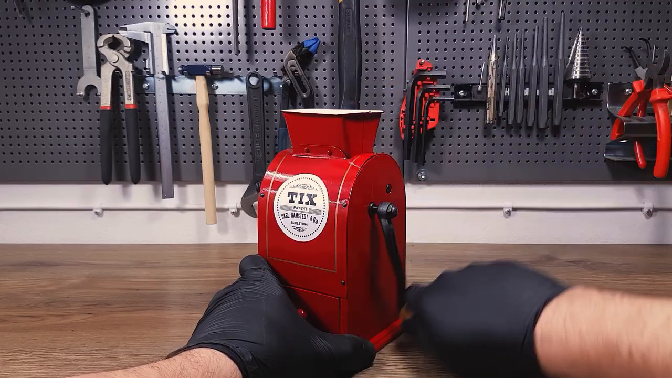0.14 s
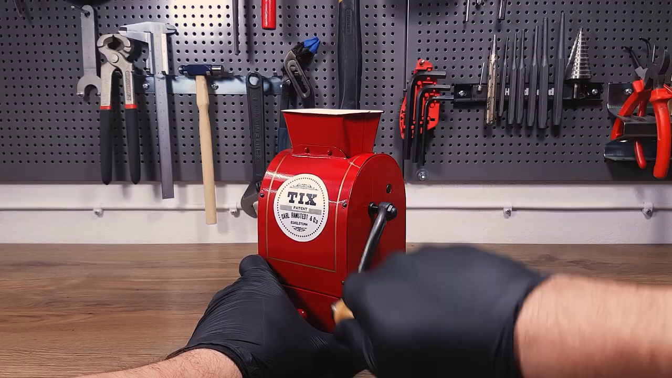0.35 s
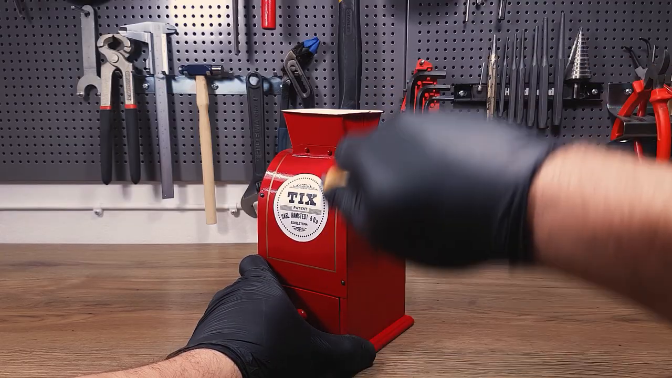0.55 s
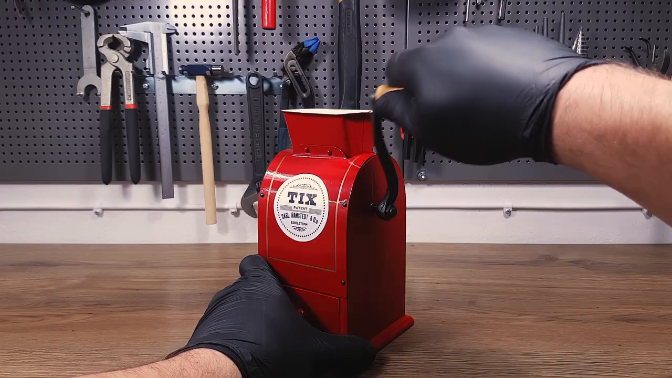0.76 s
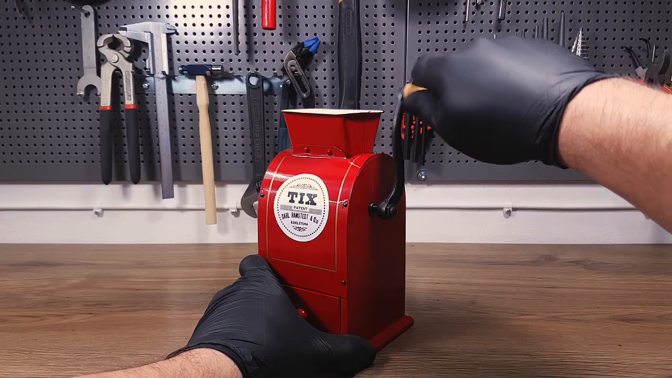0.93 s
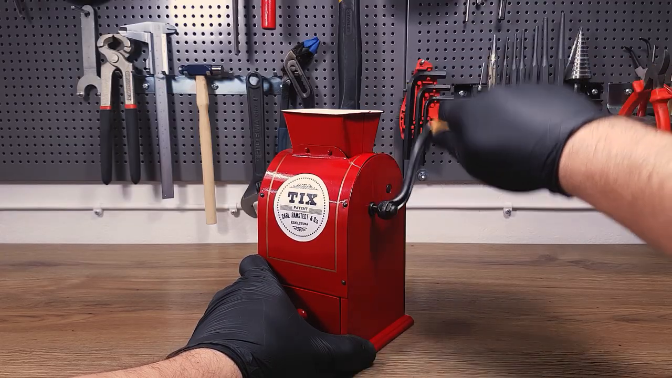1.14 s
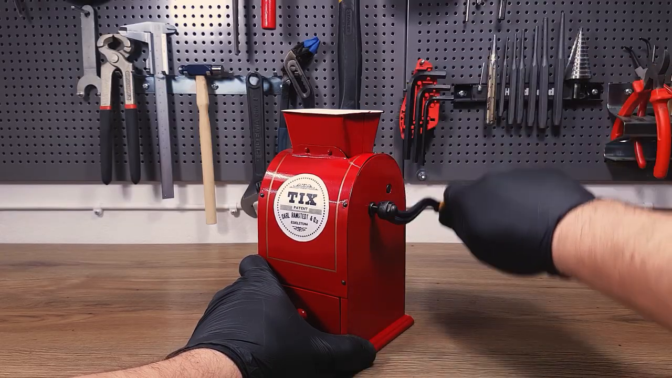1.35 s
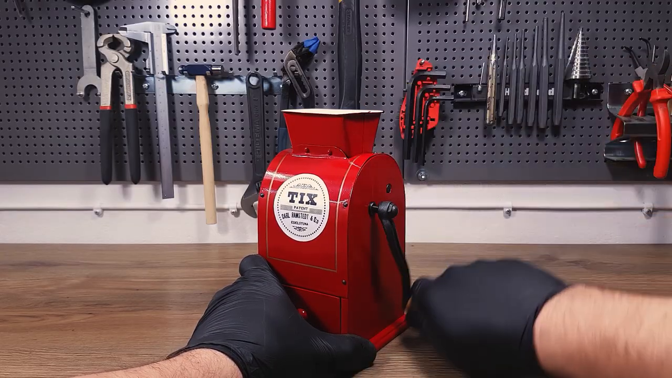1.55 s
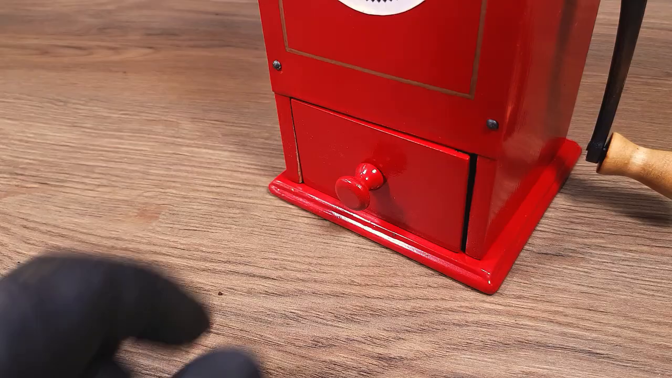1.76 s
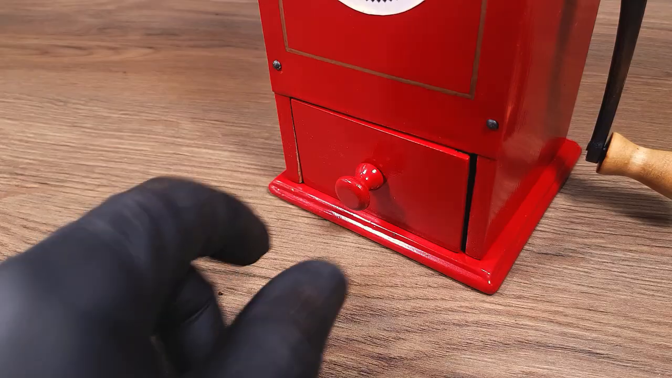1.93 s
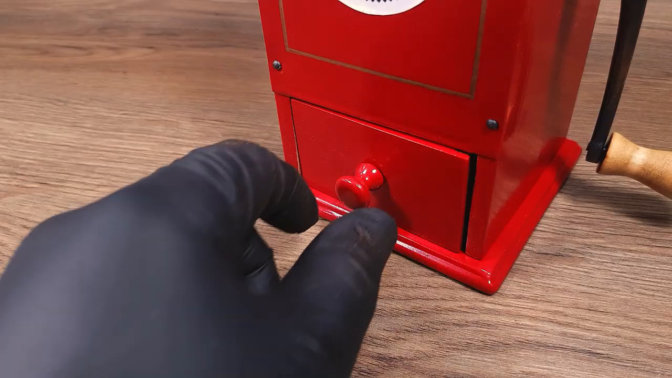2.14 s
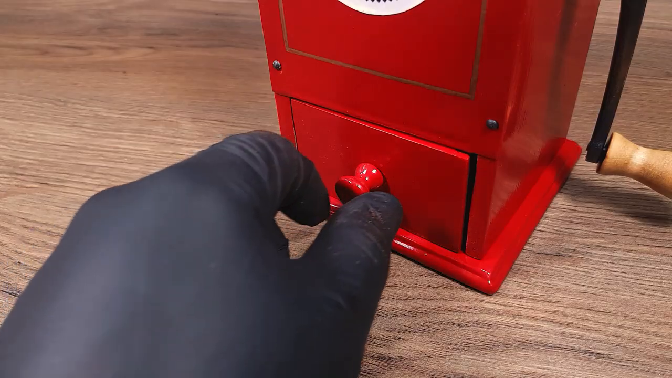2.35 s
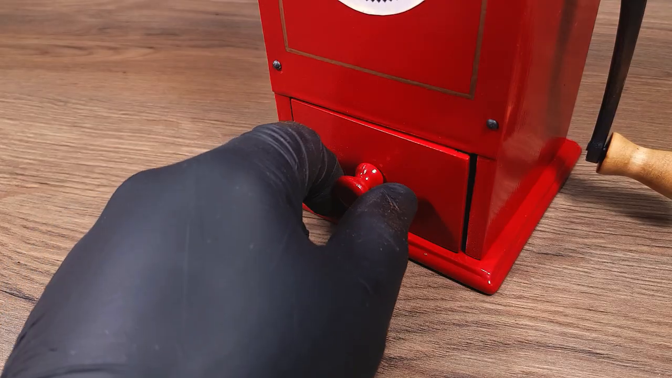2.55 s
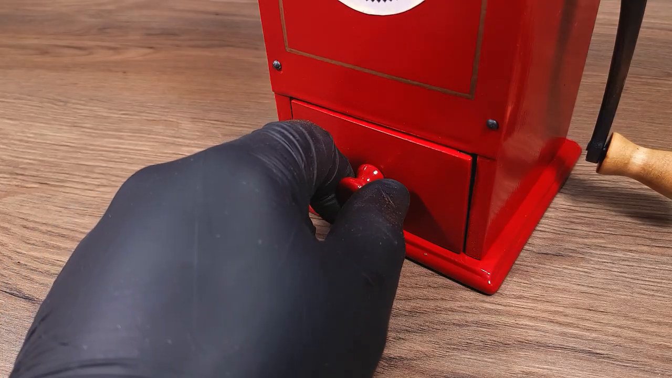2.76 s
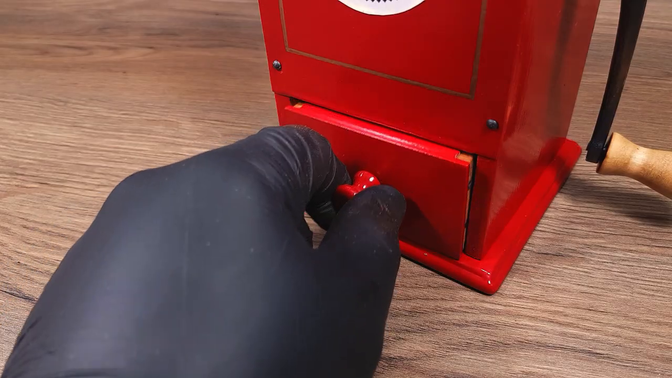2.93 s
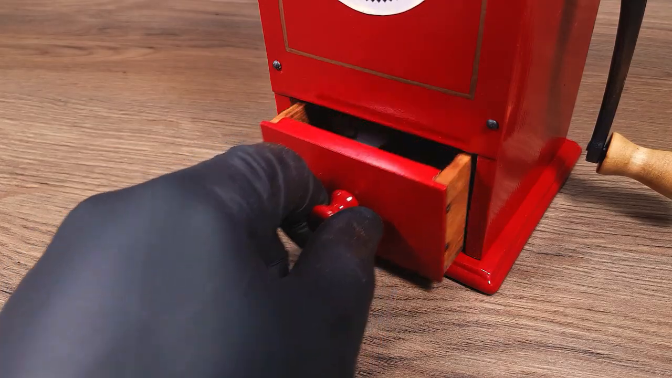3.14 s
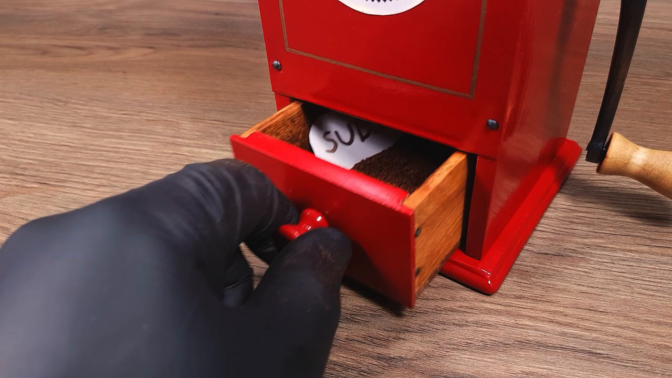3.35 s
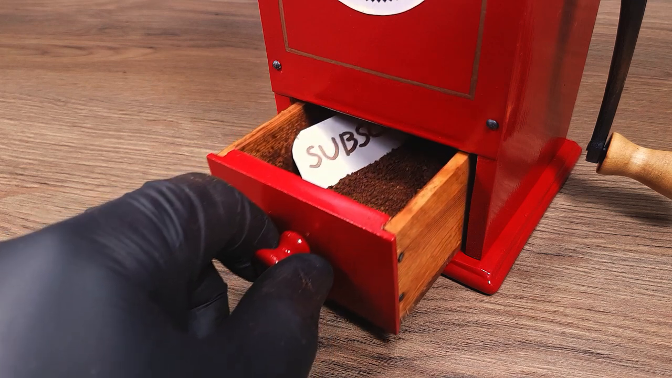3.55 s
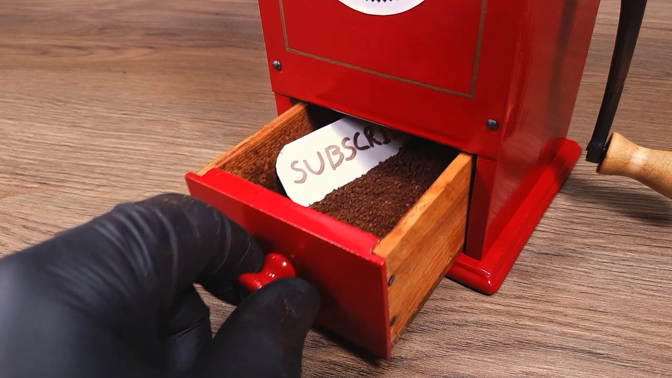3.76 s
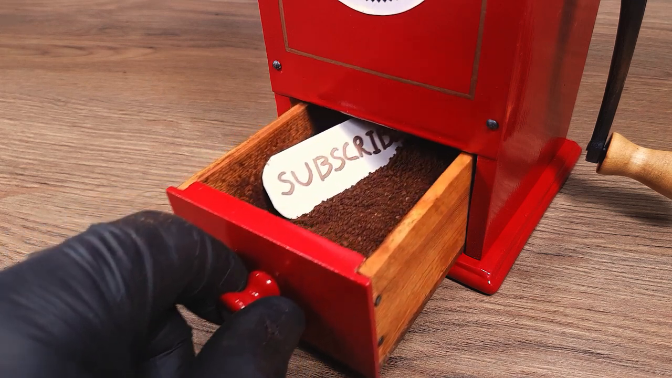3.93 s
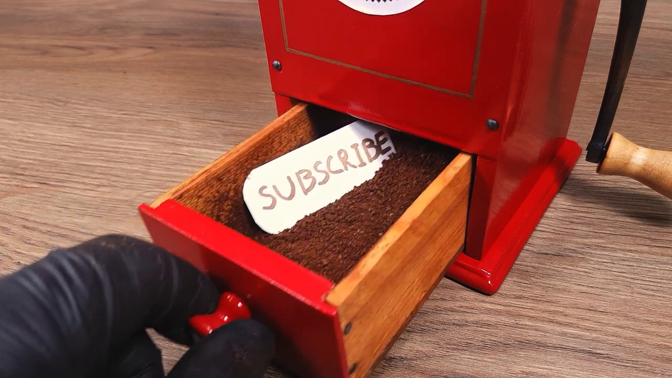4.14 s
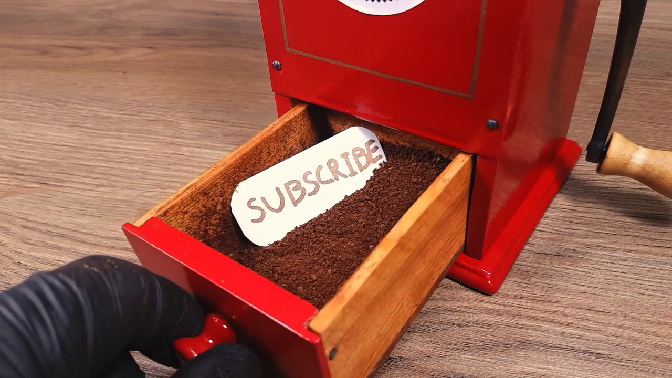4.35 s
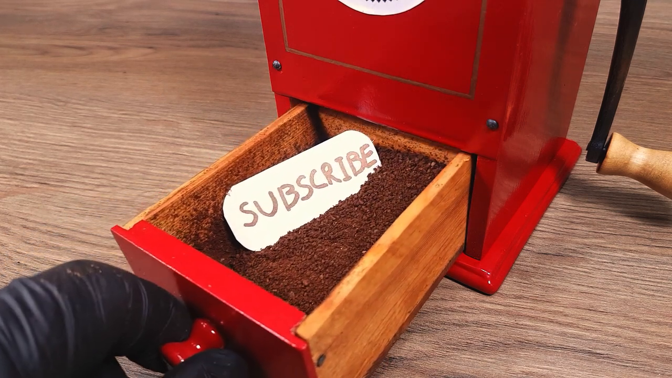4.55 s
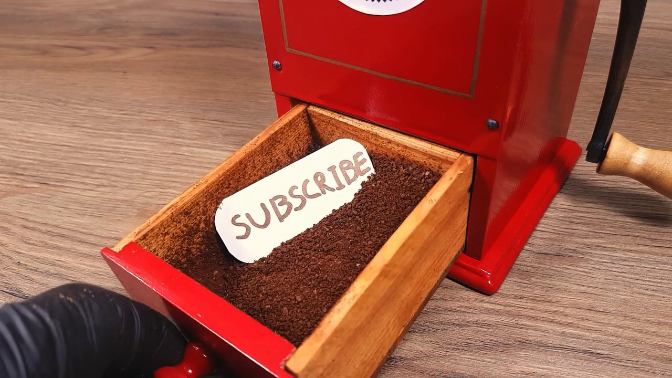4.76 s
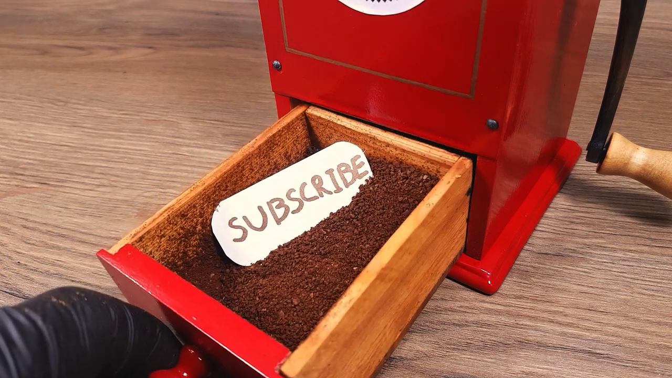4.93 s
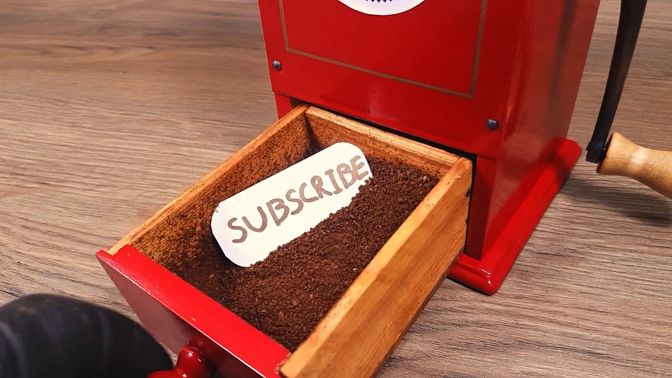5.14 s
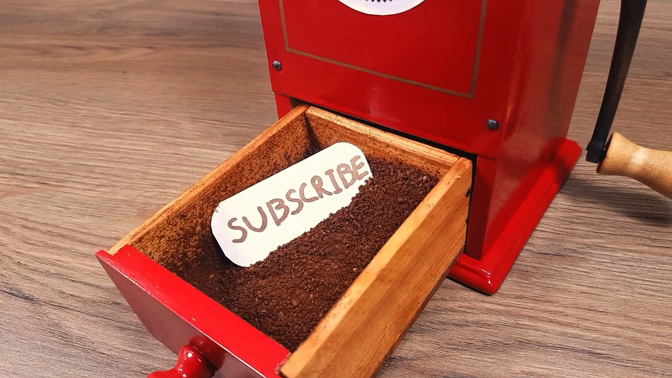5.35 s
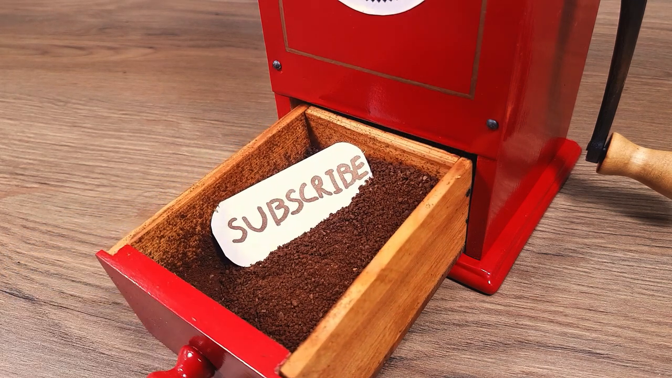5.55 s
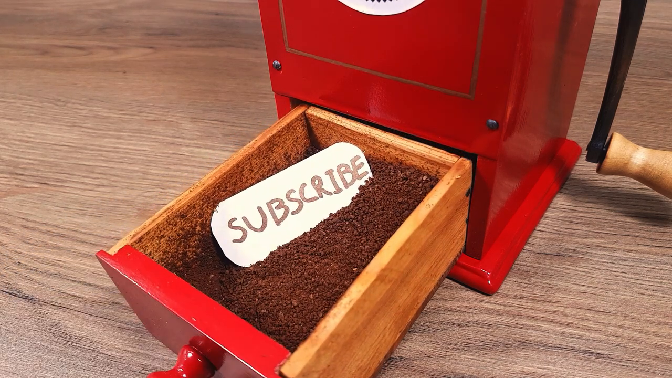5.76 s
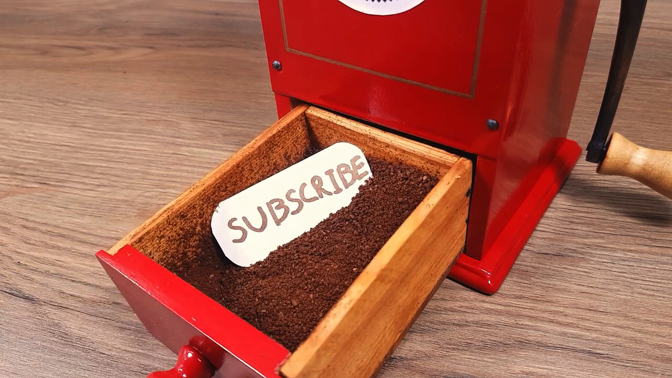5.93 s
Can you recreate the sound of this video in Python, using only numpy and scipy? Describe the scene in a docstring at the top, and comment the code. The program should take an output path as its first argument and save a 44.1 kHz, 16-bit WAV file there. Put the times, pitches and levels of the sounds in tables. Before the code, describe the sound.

Beans snap and crumble between burrs for under two seconds, ringing a thin tin shell and wooden base on a bench. The grinding and its echo are cut short. After a near-silent pause, a drawer is pulled out softly at close range: gritty wood friction, low short creaks, light taps, then two firmer knocks and faint handling. Small dry room, stereo, low rumble and hiss.

```python
"""At a workbench in a small workshop, a hand-cranked coffee mill opens the scene on a stereo microphone.
Beans crack between the burrs: bursts of force ring modes of bench, wooden base and tin shell, over a rasp.
A splice cuts the grinding and its echo short. Nearer and quieter, a gloved hand then slides out the wooden
drawer: grains of friction, short stick-slip tones, and two knocks at its end.
Shaped noise gives the room rumble and microphone hiss under it all."""
import sys
import numpy as np
from scipy import signal
from scipy.io import wavfile
from scipy.ndimage import uniform_filter1d

SR = 44100
rng = np.random.default_rng(int(sys.argv[2]) if len(sys.argv) > 2 else 0)


def dump_mix(stems):
    """Bounce the given channels to the path in sys.argv[1] as a 16-bit WAV at rate SR."""
    frames = np.atleast_2d(stems).T  # one column per channel
    limited = np.clip(frames, -1, 1)  # hard clip at full scale
    pcm = np.round(limited * 32767).astype(np.int16)
    wavfile.write(sys.argv[1], SR, pcm)


N = 264600  # 6 s


def amp(db):
    """Decibels to an amplitude factor."""
    return 10 ** (np.asarray(db) / 20)


def evened(x):
    """Scale to an rms of one."""
    return x / np.sqrt(np.mean(x ** 2) + 1e-20)


def read(points, hz):
    """Read a curve of (frequency, value) between its points, along log frequency."""
    f, value = np.transpose(points)
    return np.interp(np.log(hz + 1), np.log(f + 1), value)


# background spectrum, relative: pitch_hz, level_db (per Hz)
AIR_SPECTRUM = [(15, 13), (40, -3), (100, -0.5), (200, -7), (380, -5), (450, -12.5), (900, -12.5),
                (1800, -13), (3000, -20.5), (4800, -23.5), (8000, -29), (10000, -29), (12000, -26.5),
                (16000, -23)]
# likeness of the background at the two ports: pitch_hz, likeness (-1 to 1)
AIR_LIKENESS = [(60, 0.84), (180, 0.075), (550, -0.096), (1650, 0.15), (4970, -0.054), (15000, 0.027)]


def air():
    """Low room rumble and microphone hiss, as random short-time spectra partly shared by the two ports."""
    level_db = -67.5  # rms, before the gain of each shot
    frames, hz = N // 256 + 5, np.fft.rfftfreq(1024, 1 / SR)
    a, b, c, d = rng.standard_normal((frames, 513, 4)).T
    left, other = a + 1j * b, c + 1j * d
    same = np.clip(read(AIR_LIKENESS, hz), -1, 1)[:, None]
    right = same * left + np.sqrt(1 - same ** 2) * other
    spectra = np.array([left, right]) * amp(read(AIR_SPECTRUM, hz))[:, None]
    noise = signal.istft(spectra, nperseg=1024, noverlap=768)[1][:, :N]
    return amp(level_db) * evened(noise)


# echo of the workshop: pitch_hz, t60_s
ROOM_DECAY = [(100, 0.23), (500, 0.25), (2000, 0.23), (8000, 0.14)]


def room(x, wet_db):
    """Sparse taps of random sign, each band dying at its own speed; long waves reach both ports alike."""
    taps = np.zeros((2, SR // 2))
    grid = np.arange(120, SR // 2 - 20, 20)
    at = grid + rng.integers(0, 20, (2, len(grid)))
    np.put_along_axis(taps, at, rng.choice([-1., 1.], at.shape), 1)
    hz, t, (left, other) = signal.stft(taps, SR, nperseg=512)
    same = np.sinc(hz / 900)[:, None]
    right = same * left + np.sqrt(1 - same ** 2) * other
    decay = amp(-60 * t / read(ROOM_DECAY, hz)[:, None])
    tail = signal.istft(np.array([left, right]) * decay, SR, nperseg=512)[1]
    echo = signal.fftconvolve(x, tail / np.linalg.norm(tail[0]), axes=1)[:, :N]
    return x + amp(wet_db) * echo


def placed(x, lag_samples, pan_db):
    """The source is to the right: the left port hears it later and, with a negative pan, softer."""
    return np.array([np.roll(x[0], lag_samples), x[1]]) * amp([[pan_db / 2], [-pan_db / 2]])


def ring(modes, count=1):
    """Impulse response of each mode at each port, higher modes differing more in phase; thin walls split modes."""
    hz, db, t60 = np.repeat(modes, count, axis=0).T[:, :, None]
    hz = hz * (1 + 0.0115 * (count - 1) * rng.standard_normal(hz.shape))
    t = np.arange(SR // 4) / SR
    turn = rng.standard_normal(hz.shape) * np.minimum(0.39 + hz / 2200, 1.2)  # radians between ports
    decay = amp(db - 60 * t / t60) / np.sqrt(t60)
    onset = np.minimum(hz * t / 0.39, 1) ** 2
    shapes = [decay * onset * np.sin(2 * np.pi * hz * t + side * turn) for side in (0, 1)]
    return hz[:, 0], np.array(shapes)


def colour(points):
    """A causal click with the given spectrum, scattered for a moment in another way for each port."""
    hz = abs(np.fft.fftfreq(4096, 1 / SR))
    gain = np.log(amp(np.maximum(read(points, hz), -100)))
    click = np.fft.ifft(np.exp(np.conj(signal.hilbert(gain)))).real[:1024]  # minimum phase
    scatter = rng.standard_normal((2, 6, 200)) * np.exp(-np.arange(200) / SR / 0.00055)
    shapes = signal.fftconvolve(scatter, click[None, None], axes=2)
    return np.ones(6), shapes / np.linalg.norm(shapes, axis=2, keepdims=True)


def struck(part, spot_db, favoured_hz=1, fall_db=0):
    """One spot of the object: it wakes each mode more or less, in either sense, less those far from one pitch."""
    hz, shapes = part
    octaves_away = abs(np.log2(hz / favoured_hz))
    db = spot_db * rng.standard_normal(len(hz)) - fall_db * octaves_away
    return np.einsum("cmt,m->ct", shapes, amp(db) * rng.choice([-1, 1], len(hz)))


def grains(per_s, spread_db, ms):
    """Random small breaks, a few of them large, each a short dying burst of noise."""
    size = amp(spread_db * np.minimum(rng.exponential(1, N), 4)) * (rng.random(N) < per_s / SR)
    power = signal.lfilter([1], [1, -np.exp(-2000 / (ms * SR))], size ** 2)
    return np.sqrt(power) * rng.standard_normal(N)


def shares(curve, parts_db, follow):
    """One control shakes three parts of an object, each by its own amount; the treble has its own level."""
    s, push, treble = np.transpose(curve)
    mid = push.mean()
    levels = [mid + db + k * (push - mid) for db, k in zip(parts_db, follow)]
    return np.transpose([s, *levels, treble])


def rubbed(parts, curve, breaks, smooth, spot_db):
    """Small breaks at several spots, over a smooth scrape, drive all parts of one object."""
    s, *levels = np.transpose(curve)
    a, b = round(s[0] * SR), round(s[-1] * SR)
    out = np.zeros((2, N))
    spots = [grains(**breaks)[a:b] for _ in range(3)]
    for part, db, even in zip(parts, levels, smooth):
        level = amp(np.interp(np.arange(a, b) / SR, s, db)) / np.sqrt(len(spots) * (1 + even ** 2))
        for spot in spots:
            force = level * (evened(spot) + even * rng.standard_normal(b - a))
            body = struck(part, spot_db)
            body = body / np.linalg.norm(body[1])
            sound = signal.oaconvolve(force[None], body, axes=1)[:, :N - a]
            out[:, a:a + sound.shape[1]] += sound
    return out


def hit(parts, events, bench_db, spot_db, fall_db):
    """Each blow is a sharp break and a dying, grainy burst of force on a new spot; the bench follows the thud."""
    bench_hz, bench_fall_db = 192, 3  # pitch most woken in the bench, loss per octave away
    dry_db, dry_s = 2, 0.0018  # the pressing contact damps the first moments: a dry crack over the ring
    out, t = np.zeros((2, N + SR)), np.arange(SR // 10) / SR
    for at, db, hz, thud_db, high_db, length in events:
        first_break = 1.06 * np.exp(-t / 0.00042)
        crumbling_tail = 0.2 * np.exp(-t / (5.7 * length))
        force = np.exp(-t / length) + first_break + crumbling_tail
        blow = rng.standard_normal(len(t)) * np.minimum(t / 0.00021, 1) * force
        # in order: bench, thudding wood, main walls, treble
        rel_dbs = (thud_db + bench_db, thud_db, 0, high_db)
        pitches, falls = (bench_hz, 1, hz, 1), (bench_fall_db, 0, fall_db, 0)
        for part, rel_db, pitch, fall in zip(parts, rel_dbs, pitches, falls):
            body = struck(part, spot_db, pitch, fall)
            body = body * (1 + amp(dry_db) * np.exp(-np.arange(body.shape[1]) / SR / dry_s))
            sound = signal.fftconvolve(blow[None], body, axes=1)
            start = round(at * SR)
            out[:, start:start + sound.shape[1]] += amp(db + rel_db) * sound / abs(sound).max()
    return out[:, :N]


def stick_slip(rows):
    """Short swells of regular stick and slip: a wavering tone with a faint octave, alike at both ports."""
    at, db, hz, half = np.transpose(rows)[:, :, None]
    t = np.arange(N) / SR - at
    waver = 0.42 * evened(uniform_filter1d(rng.standard_normal(N), 900)) / np.pi
    turns = hz * t + rng.random((len(at), 1)) + waver
    swell = amp(db) * np.exp(-(t / half) ** 2)
    tone = np.sin(2 * np.pi * turns) + 0.1 * np.sin(4 * np.pi * turns)
    return (swell * tone).sum(0)


# modes of the bench under mill and drawer, of the wooden box and of its panels, nominal and relative:
# pitch_hz, level_db, t60_s
BENCH_MODES = [(59.7, -1.5, 0.086), (85, -18, 0.13), (100.4, -2.5, 0.13), (160.4, -4, 0.34),
               (190.8, 1, 0.1), (247.5, -4.5, 0.092)]
BOX_MODES = [(325.6, -2, 0.12), (440.3, -6.5, 0.12), (522, -2.5, 0.037), (595.6, 0, 0.065),
             (666, -7.5, 0.058)]
PANEL_MODES = [(824, -3, 0.046), (1080, -7.5, 0.0063), (1206, -12, 0.055), (1413, -1, 0.026),
               (1587, -3, 0.068), (1905, -0.5, 0.024), (2193, -1.5, 0.022), (2390, 0, 0.0055),
               (2810, -1.5, 0.011), (3314, -7, 0.032)]
# spectrum of coffee grit under the wood, relative: pitch_hz, level_db (per Hz)
GRIT_SPECTRUM = [(1800, -21), (2800, 3), (3900, -1), (4700, -1), (5900, -3), (6800, -0.5), (8500, -10),
                 (10500, -9.5), (13000, -10), (16000, -23)]
# drawer and hand rubbing, between points: time_s, pressure_db, grit_db
SLIDE_CURVE = [(1.69, -78, -90), (2.47, -77.5, -88), (2.96, -69, -84), (3.09, -62, -77), (3.24, -63.5, -83),
               (3.37, -60, -68.5), (3.51, -63, -78), (3.72, -64, -74.5), (3.86, -65, -72.5),
               (4.01, -63, -68.5), (4.2, -66.5, -77), (4.34, -71, -86), (4.51, -74.5, -101),
               (4.73, -74, -87), (4.89, -66.5, -88), (5.4, -73.5, -88), (5.64, -75, -86), (6.0, -70.5, -94)]
# share of the rubbing: bench_db, box_db, panels_db at middling pressure
DRAWER_SHARE_DB = (0.5, -6, -8.5)
# how each follows the pressure: bench, box, panels (dB per dB)
DRAWER_SHARE_FOLLOW = (0.84, 1.11, .6)
# taps, slips and knocks of the drawer, before pan and room:
# start_s, panel_peak_db, panel_pitch_hz (most woken), box_thud_db, grit_db (both re panel), contact_s
DRAWER_KNOCKS = [(2.695, -58, 786, 4.5, 4.5, 0.0019), (2.903, -57.5, 1840, -4, -17, .0049),
                 (2.942, -59, 1340, 3, -0.5, 0.0042), (3.029, -60, 791, 8, 5.5, 0.005),
                 (3.067, -58.5, 845, 4.5, 2.5, 0.0041), (3.234, -43, 2940, -3, 4.5, 0.0023),
                 (3.328, -60, 1900, -9, 6.5, .0046), (3.341, -60, 1590, -2, 7, .0039),
                 (3.384, -56, 1600, -2, 3, .0035), (3.489, -47.5, 2500, -12, -3, 0.0026),
                 (3.678, -52.5, 1800, -1, -2.5, 0.0033), (3.768, -53, 1330, -7, -5, 0.0031),
                 (3.806, -61, 2290, -18, 7, .0035), (3.862, -53.5, 1520, 1.5, -8, .0035),
                 (3.9, -55, 2160, -5, -14, .0035), (3.931, -53.5, 1500, 1, -14, 0.0058),
                 (3.963, -51.5, 791, -1, -20, 0.0042), (4.007, -51.5, 2190, -4, -8, 0.0051),
                 (4.031, -55.5, 1390, -9, 2, .0041), (4.068, -57, 2220, -5, 2, .0028),
                 (4.774, -38.5, 970, 0, -21, 0.0068), (4.814, -48, 1200, 8, -12, 0.0067),
                 (4.842, -56, 1200, 7, -25, .006), (4.984, -55.5, 2070, -6, -16, 0.0098),
                 (5.012, -43.5, 1310, 5.5, -18, 0.0025), (5.018, -50, 2310, 5, -30, 0.0075)]
# the drawer sticks and shudders: middle_s, level_db (main tone, before pan and room), pitch_hz,
# half_length_s (to 1/e)
DRAWER_SHUDDERS = [(2.22, -60, 170, 0.0078), (2.94, -56, 193.5, 0.032), (3.07, -54.5, 203, 0.024),
                   (3.17, -52, 193, 0.045), (3.39, -55, 209, 0.042), (3.43, -61, 254, 0.014),
                   (3.51, -51.5, 191.5, 0.024), (3.71, -58, 252, 0.024), (3.825, -55, 190, 0.025),
                   (3.94, -57, 178, 0.029), (4.29, -54, 198.6, 0.027), (4.7, -52, 213, 0.016),
                   (4.8, -40.5, 181, 0.018), (4.85, -46.5, 184.4, 0.019), (5.03, -48.5, 188, 0.015),
                   (5.26, -54, 166.4, 0.02), (5.85, -59.5, 173, 0.02)]


def drawer():
    """Wood slipping over wood and coffee grit: rubbing grains, blows and shudders ring bench, box and panels."""
    parts = [ring(BENCH_MODES), ring(BOX_MODES, count=3), ring(PANEL_MODES, count=4), colour(GRIT_SPECTRUM)]
    curve = shares(SLIDE_CURVE, DRAWER_SHARE_DB, DRAWER_SHARE_FOLLOW)
    breaks = dict(per_s=120, spread_db=3.5, ms=2.)
    scrape = rubbed(parts, curve, breaks, smooth=(1.7, 1.2, 0.7, 0.36), spot_db=0.0)
    knocks = hit(parts, DRAWER_KNOCKS, bench_db=-4.5, spot_db=4.0, fall_db=13.0)
    return scrape + knocks + stick_slip(DRAWER_SHUDDERS)


CUT_S = 1.674  # the splice that ends the grinding
# the grinding between cracks, between points: time_s, crank_load_db, burr_rasp_db
GRIND_CURVE = [(0.0, -46.5, -63), (0.116, -51.5, -88), (0.232, -59, -73), (0.496, -63.5, -72.5),
               (0.632, -53.5, -76), (0.804, -55, -68.5), (0.994, -54, -66.5), (1.096, -50.5, -66.5),
               (1.302, -50.5, -63), (1.468, -50.5, -62.5), (1.516, -47.5, -66), (1.636, -52, -59.5),
               (1.67, -47.5, -64)]
# chips between the cracks, one row: over_load_db, scatter_db (either way), shell_pitch_hz (middle),
# base_thud_db, burr_snap_db (middle; both re shell), crumbling_s
CHIP_SETTINGS = (8, 1, 1708, -20, -12.5, 0.05)


def chips(count):
    """Small cracks at scattered moments, as strong as the load on the crank."""
    over_db, scatter_db, hz, thud_db, snap_db, length = CHIP_SETTINGS
    place, size, pitch, tone = rng.random((count, 4)).T
    at = (np.arange(count) + place) * CUT_S / count
    s, load, _ = np.transpose(GRIND_CURVE)
    db = np.interp(at, s, load) + over_db + scatter_db * (2 * size - 1)
    pitches = hz * 2 ** (pitch - .5)
    snaps = snap_db + 12 * (tone - .5)
    return [(a, d, p, thud_db, snap, length) for a, d, p, snap in zip(at, db, pitches, snaps)]


# modes of the mill's wooden base and tin shell, nominal and relative: pitch_hz, level_db, t60_s
BASE_MODES = [(326.3, 5, 0.12), (374, -20, 0.19), (452, 2, 0.12), (510, -0.5, 0.3), (554, 2.5, 0.031),
              (618.7, 4, 0.095), (730, -12.5, 0.091)]
SHELL_MODES = [(841, -4, 0.098), (933, 0, 0.12), (1068, -3.5, 0.045), (1266, -9, 0.017), (1427, -6, 0.027),
               (1523, -5, 0.091), (1653, 2.5, 0.011), (1867, -1, 0.045), (1920, -9, 0.014),
               (2196, -2.5, 0.026), (2346, -10.5, 0.018), (2684, -8, 0.039), (3150, -10, 0.037),
               (3670, -12.5, 0.0094)]
# spectrum of the burrs, relative: pitch_hz, level_db (per Hz)
BURR_SPECTRUM = [(1800, -44), (3000, 8), (4000, 3.5), (5200, -4), (5900, 0.5), (7500, -2.5), (8700, -6),
                 (9700, -22), (11000, -11), (13000, -24.5), (15500, -12), (16000, -40)]
# share of the grinding: bench_db, base_db, shell_db at middling load
MILL_SHARE_DB = (-5, -2, -5.5)
# how each follows the load: bench, base, shell (dB per dB)
MILL_SHARE_FOLLOW = (0.26, 0.67, 1.28)
# beans cracking, before pan and room:
# start_s, shell_peak_db, shell_pitch_hz (most woken), base_thud_db, burr_snap_db (both re shell), crumbling_s
BEAN_CRACKS = [(0.036, -39, 958, 6, -23, 0.0021), (0.062, -31.5, 953, -7, -18, 0.003),
               (0.097, -35, 977, -4.5, -14, 0.0035), (0.122, -38, 1000, 3, -7.5, 0.0036),
               (0.148, -46.5, 810, 9, -21, 0.0042), (0.222, -52, 1590, -6, -26, 0.0042),
               (0.29, -36, 2250, -9, -4.5, 0.0033), (0.329, -43, 2870, -13, -6, 0.003),
               (0.409, -33.5, 1540, -14, -15, 0.0051), (0.429, -40, 1650, -3, -9, 0.0042),
               (0.504, -43, 1350, -17, -4.5, 0.0084), (0.525, -47, 1247, 2, -4, 0.0042),
               (0.552, -46, 1540, -11, 2, 0.0021), (0.636, -46, 991, 5.5, -11, 0.0084),
               (0.679, -36.5, 1520, -7.5, -16, 0.0084), (0.718, -39.5, 832, -11, -16, 0.0042),
               (0.753, -37, 1770, -9.5, -16, 0.0049), (0.77, -39.5, 1920, -5.5, -10, 0.0036),
               (0.818, -43, 2190, -27, -21, 0.0031), (0.844, -38, 1910, -38, -26, 0.0042),
               (0.873, -40, 1890, -23, -27, 0.0048), (0.898, -31, 956, -15, -20, 0.0024),
               (0.932, -25, 1480, -17.5, -12.5, 0.0035), (0.991, -34.5, 1530, -38, -13, 0.0045),
               (1.013, -36.5, 1500, -32, -29, 0.0037), (1.062, -49, 1570, -20, -22, 0.0042),
               (1.086, -29.5, 1720, -14, -38, 0.0042), (1.128, -33, 1510, -26, -8, 0.0045),
               (1.166, -33, 1820, -18, -25, 0.0021), (1.213, -28.5, 1860, -12, -11, 0.0046),
               (1.235, -34, 942, -13, -8, 0.0031), (1.299, -38.5, 1600, -14, -17, 0.0037),
               (1.312, -32.5, 1920, -25, -5.5, 0.0045), (1.339, -44, 875, -19, -20, 0.005),
               (1.374, -36, 1520, -29, -12, 0.0042), (1.389, -32, 1630, -20, -24, 0.0082),
               (1.408, -30, 1880, -11, -10.5, 0.0061), (1.459, -41.5, 1550, 0.5, -17, 0.0059),
               (1.502, -29, 1780, -9.5, -10.5, 0.0048), (1.535, -34, 1950, -1.5, -6, 0.0042),
               (1.561, -23.5, 1570, -2, -19, 0.0045), (1.596, -36, 880, -1.5, -13, 0.0039),
               (1.618, -28.5, 1700, -7.5, -6, 0.0042), (1.624, -31.5, 1500, -3.5, -13, 0.0054)]
# a jammed bean makes the crank judder and the base sing: middle_s, level_db (main tone, before pan and room),
# pitch_hz, half_length_s (to 1/e)
CRANK_JUDDERS = [(.05, -47, 600, 0.053), (.13, -47.5, 510, 0.012), (.16, -44, 186, 0.015),
                 (.535, -46.5, 511, 0.0095), (1.155, -47.5, 519, 0.021), (1.245, -43, 594, 0.013),
                 (1.32, -42.5, 519, 0.014), (1.46, -42, 613, 0.059), (1.575, -35.5, 487, 0.01),
                 (1.585, -48, 320, 0.0078)]


def mill():
    """Crushed crumbs and cracking beans shake bench, base, shell and burrs at once."""
    parts = [ring(BENCH_MODES), ring(BASE_MODES, count=2), ring(SHELL_MODES, count=4), colour(BURR_SPECTRUM)]
    curve = shares(GRIND_CURVE, MILL_SHARE_DB, MILL_SHARE_FOLLOW)
    breaks = dict(per_s=260, spread_db=3.5, ms=3.)
    crumbs = rubbed(parts, curve, breaks, smooth=(0.47, 0.58, 0.53, 0.12), spot_db=2.0)
    blows = chips(count=30) + list(BEAN_CRACKS)
    cracks = hit(parts, blows, bench_db=-8., spot_db=2.0, fall_db=6.5)
    return crumbs + cracks + stick_slip(CRANK_JUDDERS)


def scene():
    """Two shots joined by a splice that also cuts off the echo of the first."""
    before = np.clip((CUT_S - np.arange(N) / SR) / 0.00094, 0, 1)
    grinding = room(placed(mill(), lag_samples=1, pan_db=-1.5), wet_db=-6.0)
    sliding = room(placed(drawer(), lag_samples=6, pan_db=-1.5), wet_db=-8.0)
    background = amp(-4. * before) * air()  # less gain for the loud shot
    return before * grinding + sliding + background


def record(dry):
    """The microphone loses the deepest bass; the converter adds a standing voltage; the treble ends at a limit."""
    offset, edge_hz = -0.00036, 15830  # offset as a share of full scale
    thin = signal.sosfilt(signal.butter(2, 55, "high", fs=SR, output="sos"), dry) + offset
    band_limit = signal.firwin(1023, edge_hz, window=("kaiser", 9), fs=SR)
    return signal.oaconvolve(thin, band_limit[None], "same")


dry = scene()
out = record(dry)
dump_mix(out)
```